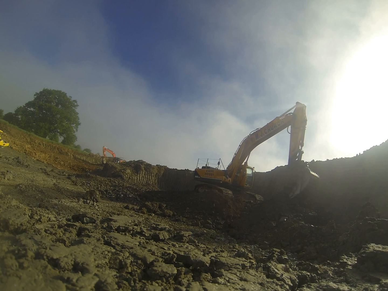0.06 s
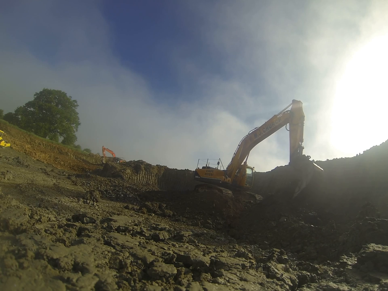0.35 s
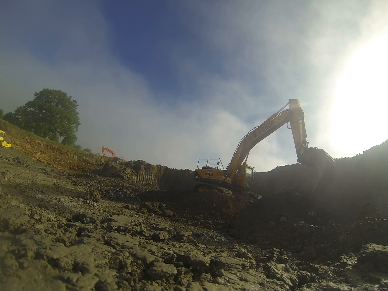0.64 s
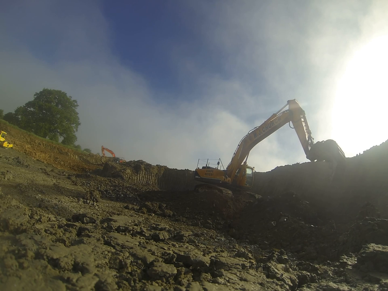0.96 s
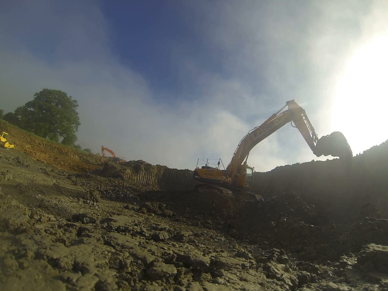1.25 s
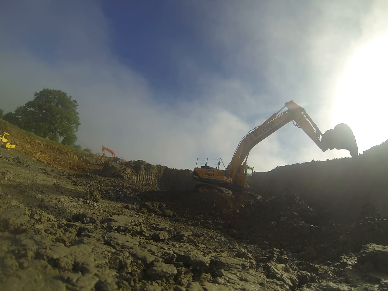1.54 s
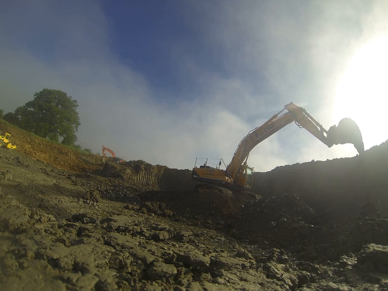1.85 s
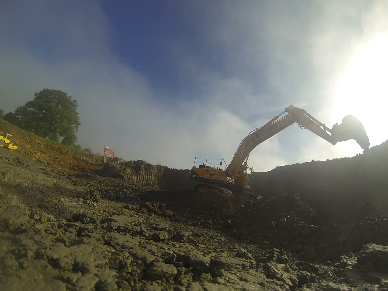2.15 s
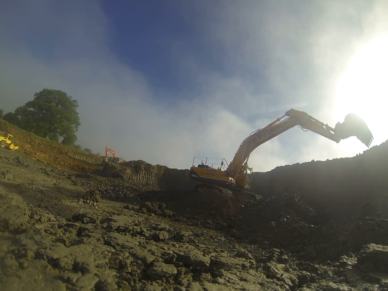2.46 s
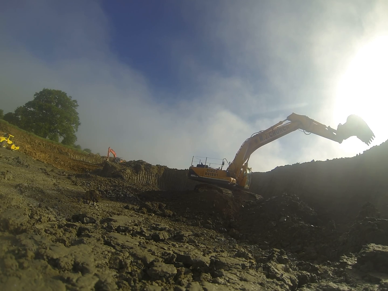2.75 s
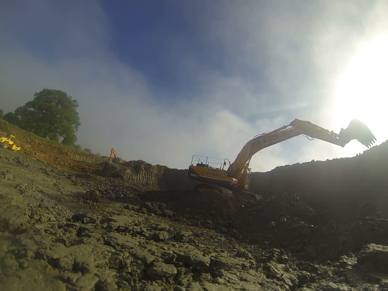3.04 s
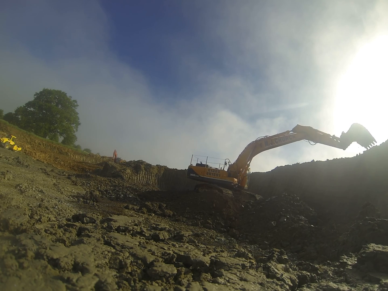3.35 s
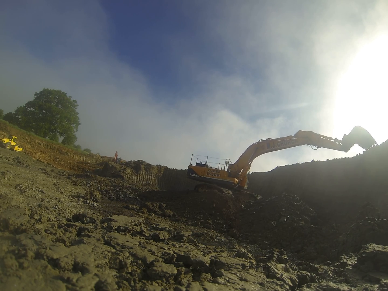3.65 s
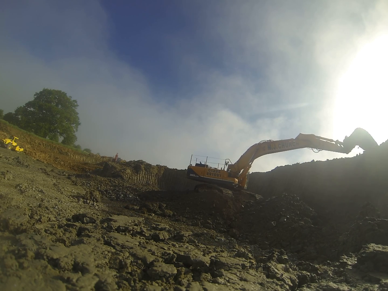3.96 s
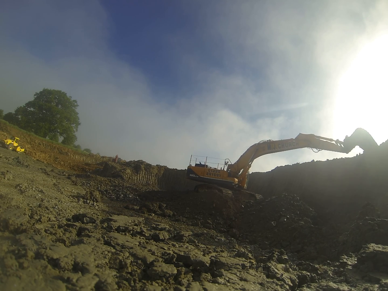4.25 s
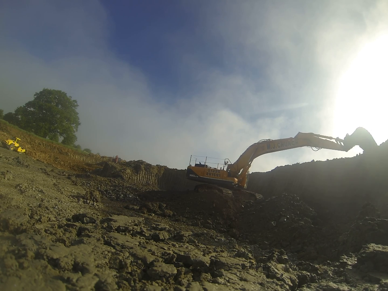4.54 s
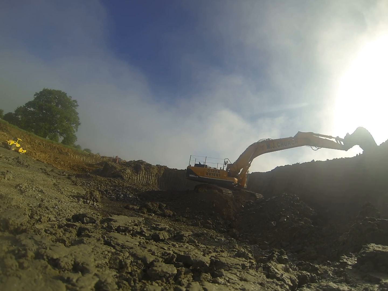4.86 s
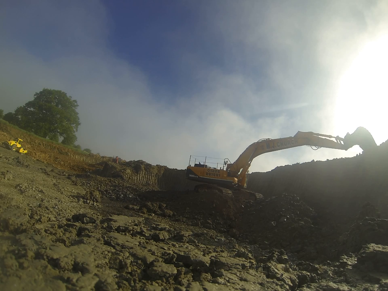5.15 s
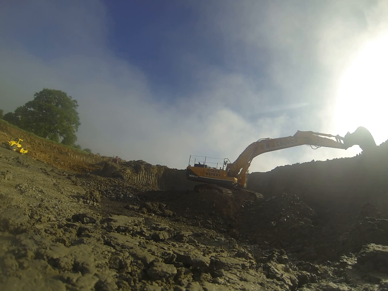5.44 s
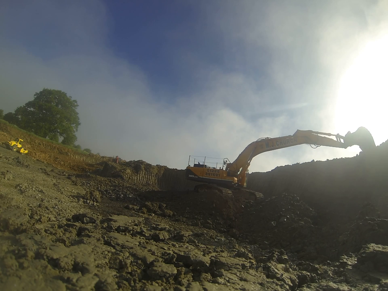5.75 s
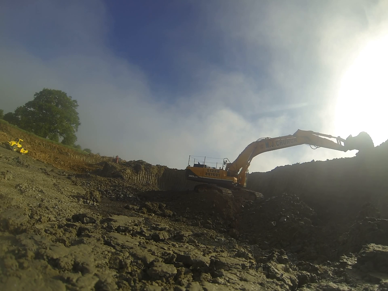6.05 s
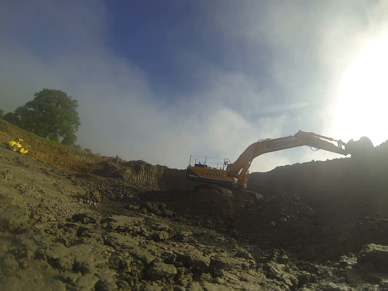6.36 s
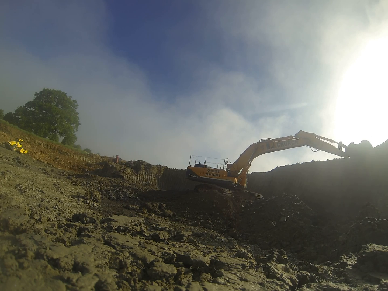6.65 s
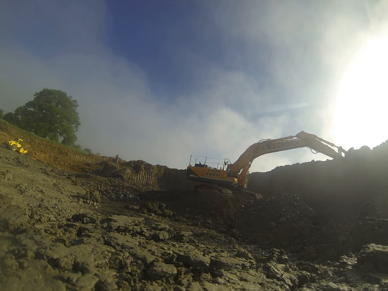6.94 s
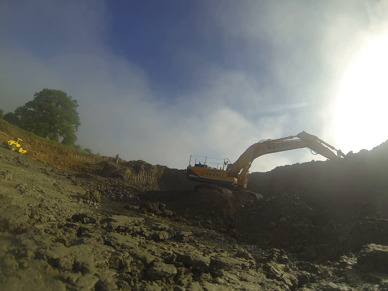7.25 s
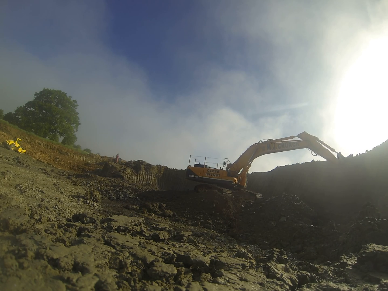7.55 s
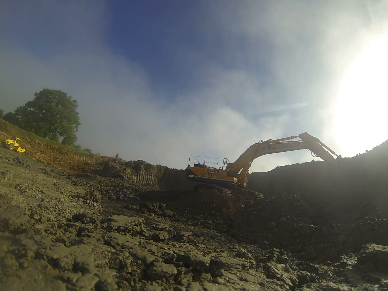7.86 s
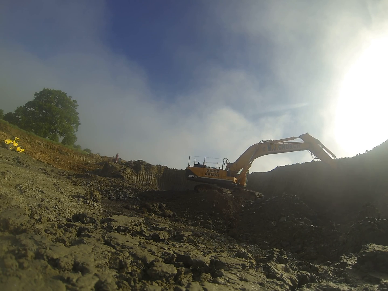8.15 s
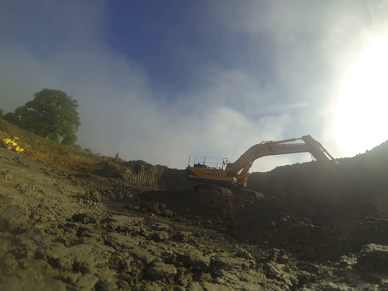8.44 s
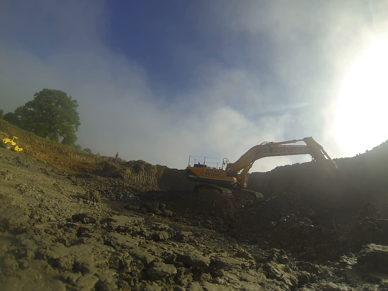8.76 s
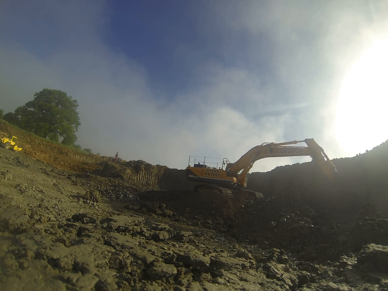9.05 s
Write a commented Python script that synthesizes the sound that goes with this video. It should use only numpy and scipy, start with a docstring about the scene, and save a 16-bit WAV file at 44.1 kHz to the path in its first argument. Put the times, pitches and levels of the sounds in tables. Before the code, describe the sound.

Diesel engines hum and clatter some way off as a digger's steel bucket knocks and tips earth, and one engine winds down.

```python
"""Some way off, a tracked excavator's bucket crunches into a stony slope while its six-cylinder diesel
drones and its piston pump sings. A second diesel holds top speed, with a humming fan and a whistling turbo.
A deep throb, like a vibrating roller, swells and fades through the ground all along. Near 4 s the bucket
tips, knocks and spills soil; at 5.5 s comes a short rattle. From 5.8 s the second diesel winds down,
its whistle falling, while the excavator works on."""
import sys
import numpy as np
from scipy.fft import rfft, irfft, next_fast_len
from scipy.io import wavfile
from scipy.ndimage import map_coordinates

SR = 44100
rng = np.random.default_rng(int(sys.argv[2]) if len(sys.argv) > 2 else 0)


def unload_wav(signal):
    """Save mono or channel-first audio to the path in sys.argv[1] as 16-bit WAV at rate SR, clipped to [-1, 1]."""
    wavfile.write(
        sys.argv[1],
        SR,
        np.round(np.clip(np.atleast_2d(signal).T, -1, 1) * 32767).astype(np.int16),
    )


N = 401310
T = np.arange(N) / SR


# the engine's speed wanders as its load changes: (time [s], firing rate [Hz])
ENGINE_SPEED = [(0.0, 88.7), (0.59, 84.93), (1.0, 86.7), (2.36, 86.7), (2.63, 89.0), (2.95, 85.64),
                (3.27, 87.4), (4.22, 86.3), (4.4, 88.8), (4.54, 86.6), (4.72, 87.1), (4.9, 88.7),
                (5.44, 87.93), (5.67, 85.96), (6.03, 89.2), (6.17, 86.35), (6.35, 87.34), (6.76, 88.45),
                (6.98, 85.06), (7.57, 89.04), (8.16, 86.7), (9.07, 87.1)]
def excavator():
    """The cylinders fire one after another, setting the beat for the engine and its oil pump."""
    firings = np.cumsum(curve(ENGINE_SPEED) * (1 + 0.0028 * wobble(8))) / SR  # counted from the start
    strokes = 3 * firings  # the pump's pistons beat three times per firing
    return (exhaust(firings) + pump(strokes) + arm_valve(firings, strokes)
            + engine_body(firings) + oil_hiss(firings))


# how loud the exhaust hums: (time [s], level [dB])
EXHAUST_LEVEL = [(0.0, -51), (0.23, -41.5), (0.58, -43.5), (0.71, -56), (1.59, -41.5), (1.95, -51),
                 (2.05, -66), (2.23, -44), (3.27, -41.5), (3.37, -49), (3.8, -39.5), (4.33, -45),
                 (4.69, -38.5), (5.02, -49), (5.27, -40.5), (5.4, -52), (5.53, -44), (5.9, -39.5),
                 (6.33, -55), (6.56, -42.5), (7.02, -45.5), (9.05, -44.5), (9.1, -53)]
def exhaust(firings):
    """One puff per firing makes a low hum, with a second tone an octave up (twice the pitch)."""
    hum = amp(curve(EXHAUST_LEVEL) - 0.6) * flutter(depth_db=1, rate=6.5) * tone(firings)
    return hum + amp(-55) * flutter(1.6, 5.4) * tone(2 * firings)


# the pump sings louder under load: (time [s], level before its dips are deepened [dB])
PUMP_LEVEL = [(0.0, -62), (0.12, -55), (0.58, -61), (1.09, -75), (2.43, -61.5), (2.71, -55), (2.81, -74),
              (2.91, -57.5), (3.27, -69), (3.42, -54), (3.52, -63), (3.85, -50), (4.61, -49.5), (4.66, -62),
              (5.04, -53.5), (6.74, -52.5), (7.0, -63.5), (8.46, -53.5), (8.62, -69.5), (8.92, -52),
              (9.1, -52)]
# ripples in the oil pressure: (time [s], level [dB])
RIPPLE_LEVEL = [(0, -85), (.4, -62), (.8, -71), (2.5, -68), (4.15, -72), (4.5, -62.5), (5.8, -61.5),
                (6.1, -72), (7.8, -63.5), (8.3, -70)]
def pump(strokes, full_load_db=-49, dip_scale=1.21):
    """The pistons push oil in quick beats, making a note; pressure ripple adds its octave."""
    level_db = full_load_db + dip_scale * (curve(PUMP_LEVEL) - full_load_db)
    note = amp(level_db) * flutter(1.8, 10) * tone(strokes + 0.063 * wobble(25))
    ripple = amp(curve(RIPPLE_LEVEL)) * flutter(2, 9) * tone(2 * strokes + 0.097 * wobble(30))
    return note + ripple


# a valve's whistling rush: (frequency [Hz], level [dB])
VALVE_SPECTRUM = [(1700, -37), (1900, -5.5), (2020, 2), (2150, -7.5), (2400, -49)]
# it grows as the arm draws in: (time [s], level [dB])
RUSH_LEVEL = [(0, -70), (2.4, -67), (3.2, -67.5), (5.5, -67.5), (7.3, -63), (9.1, -63.5)]
def arm_valve(firings, strokes):
    """Oil whistles through a valve; higher pump tones and the engine's ringing covers swell with it."""
    level_db = curve(RUSH_LEVEL)
    overtones = amp(level_db - 6) * flutter(1.5, 5) * tone(4 * strokes + 0.1 * wobble(30))
    overtones += amp(level_db - 6.5) * flutter(2, 6) * tone(3 * strokes + 0.25 * wobble(30))
    covers = amp(level_db - 7) * flutter(2, 5.6) * tone(10 * firings + 0.18 * wobble(24))
    return overtones + covers + amp(level_db) * coloured(noise(), VALVE_SPECTRUM)


# the engine's low rumble: (frequency [Hz], level [dB])
RUMBLE_SPECTRUM = [(15, -31), (30, -3), (60, 3.5), (95, -1), (125, -3), (165, -3.5), (205, -12),
                   (300, -7.5), (360, -14), (500, -13), (640, -17.5), (820, -16), (1000, -23.5),
                   (1600, -58.5)]
# how loud it rumbles: (time [s], level [dB])
ENGINE_LEVEL = [(0, -46.5), (.9, -50), (2.5, -48), (5.5, -48), (6.4, -48), (7.3, -48.5), (8, -48.5),
                (9.1, -48.5)]
# clattering metal, for both engines: (frequency [Hz], level [dB])
CLATTER_SPECTRUM = [(600, -39), (980, -17), (1130, -11), (1250, -3.5), (1350, 1.5), (1460, -3.5),
                    (1580, -3), (1680, -12.5), (1830, -24), (2600, -52.5)]
# both engines' clatter surges and sinks: (time [s], level change [dB])
CLATTER_SURGE = [(0, 0), (.4, 1), (.85, -0.5), (1.05, 0), (1.21, 2.5), (1.32, -4), (1.48, 3), (1.67, -1),
                 (1.8, 2), (2.3, 0.7), (3.1, 0), (3.6, -0.9), (4.35, 0.5), (4.5, -1.5), (4.7, 0.3),
                 (5.6, -0.5), (6.95, .5), (7.27, -0.5), (7.5, 0.9), (8.45, -0.5), (9.1, -.3)]
def engine_body(firings):
    """The engine rumbles, and each firing makes its metal block clatter."""
    rumble = amp(curve(ENGINE_LEVEL)) * coloured(noise(), RUMBLE_SPECTRUM)
    knocks = noise() * bursts(firings, sharpness=0.32, scatter_db=1.26)
    return rumble + amp(-54 + curve(CLATTER_SURGE)) * coloured(knocks, CLATTER_SPECTRUM)


# the hiss of oil: (frequency [Hz], level [dB])
OIL_SPECTRUM = [(1000, -15.5), (1850, -9), (2020, -2), (2200, -5), (2480, -8), (2900, -4), (3150, -9.5),
                (3750, -13), (4400, -17), (4850, -24.5), (5250, -16), (5800, -24), (6400, -19.5),
                (7600, -33), (10000, -53)]
# how loud it hisses: (time [s], level [dB])
OIL_LEVEL = [(0, -59), (2.6, -60.5), (3.6, -60), (4.4, -60.5), (5.1, -59.5), (6.7, -60), (7.45, -58.5),
             (7.8, -61), (9.1, -60.5)]
def oil_hiss(firings):
    """Oil rushes through the valves, pulsing slightly with the engine."""
    gain = amp(curve(OIL_LEVEL)) * flutter(0.3, 10)
    return gain * coloured(noise() * bursts(firings, sharpness=0.16, scatter_db=0.58), OIL_SPECTRUM)


# the notes the bucket's steel rings at: (pitch [Hz], width [Hz], level [dB])
STEEL_NOTES = [(282, 130, 12), (515, 260, 5.5), (783, 190, 0), (1316, 100, 1), (1426, 100, -1),
               (1577, 70, -3.5), (1976, 100, -1), (2303, 130, -3.5), (2980, 140, -14), (4480, 200, -18.5),
               (5280, 120, -25)]
# knocks on the bucket and its links: (time [s], ring level [dB], ring fade time [s],
# favoured pitch [Hz], lowest pitch [Hz], crack level [dB], snap level [dB])
BUCKET_KNOCKS = [(.001, -33.5, 0.11, 1320, 250, -46, -53), (.011, -39.5, 0.21, 1980, 500, -57, -69),
                 (0.577, -43.5, 0.33, 1500, 600, -55.5, -57), (2.638, -48.5, 0.19, 2400, 750, -48, -62),
                 (3.833, -50, .14, 2300, 250, -50.5, -72), (3.871, -44, 0.23, 400, 200, -56, -70),
                 (3.912, -48.5, 0.17, 400, 200, -58, -74), (3.984, -43, 0.14, 1400, 250, -49, -60),
                 (4.025, -45.5, 0.17, 2000, 250, -49, -68), (5.519, -48, 0.16, 1350, 500, -68, -76)]
# the crack of a hit: (frequency [Hz], level [dB])
CRACK_SPECTRUM = [(200, -11), (1000, -9), (1700, 0), (2300, 5.5), (2900, 1.5), (3400, -11), (4300, -5),
                  (5200, -19), (9000, -35)]
# its higher snap: (frequency [Hz], level [dB])
SNAP_SPECTRUM = [(2500, -15), (4600, -7), (5300, 0.5), (6600, -1.5), (7400, -11), (9000, -16), (14000, -31)]
def bucket(favour_db=8, favour_octaves=0.098, attack_s=0.00033, crack_fade_s=0.12):
    """Each knock cracks, snaps and rings the soil-damped steel; where it lands picks the loudest notes."""
    hz, widths, note_db = np.transpose(STEEL_NOTES)
    # each note is a narrow band of noise around its pitch
    notes = np.array([unit(wobble(1.5 * w) * tone(f * T) + wobble(1.5 * w) * tone(f * T + 1 / 4))
                      for f, w in zip(hz, widths)])
    ring, crack, snap = np.zeros((3, N))
    for start, db, fade_s, favoured_hz, lowest_hz, crack_db, snap_db in BUCKET_KNOCKS:
        boost_db = favour_db * np.exp(-0.5 * (np.log2(hz / favoured_hz) / favour_octaves) ** 2)
        # notes below this knock's lowest pitch are softened
        gains = amp(note_db + boost_db) / (1 + (lowest_hz / hz) ** 4)
        ring += amp(db) * strike(start, attack_s, fade_s) * (gains @ notes) / np.linalg.norm(gains)
        burst = strike(start, attack_s, crack_fade_s)
        crack += amp(crack_db) * burst
        snap += amp(snap_db) * burst
    return ring + crack * coloured(noise(), CRACK_SPECTRUM) + snap * coloured(noise(), SNAP_SPECTRUM)


# stony ground breaking: (frequency [Hz], level [dB])
CRUNCH_SPECTRUM = [(80, -5), (190, 3), (330, 0.5), (520, -2), (680, -6), (800, -3), (1080, -12), (1500, -8),
                   (2300, -7), (2750, -22), (3100, -19), (4000, -31), (4500, -26), (4900, -38), (6500, -36),
                   (10000, -52)]
def bite(level_db=-35, fade_s=0.36):
    """At the start, stones break under the bucket's teeth in a dense, uneven crunch."""
    grains = amp(3.5 * wobble(420))
    return amp(level_db - 60 * T / fade_s) * coloured(noise() * grains, CRUNCH_SPECTRUM)


# brief surges in the clatter: (time [s], level [dB], fade time [s])
CLATTER_PEAKS = [(.133, -43.5, 0.14), (.278, -40.5, .06), (.469, -45, .1), (.605, -47.5, 0.23),
                 (.715, -46, 0.14), (1.232, -44, .08), (2.613, -44, .06), (5.524, -36.5, 0.16),
                 (5.572, -45, 0.14), (5.606, -49, 0.091), (5.895, -46, .07)]
def clatter_peaks(chatter_db=3, attack_s=0.002):
    """The engines' clatter surges briefly now and then, with one louder rattle at 5.5 s."""
    swell = sum(amp(db) * strike(start, attack_s, fade_s) for start, db, fade_s in CLATTER_PEAKS)
    return swell * coloured(noise() * amp(chatter_db * wobble(350)), CLATTER_SPECTRUM)


# groans and scrapes: (middle time [s], half length [s], pitch [Hz], level [dB], roughness [0-1])
STEEL_GROANS = [(.63, 0.04, 740, -58, 0.06), (0.703, 0.03, 1390, -48.5, 0),
                (2.692, 0.038, 279, -49.5, 0.09), (2.8, .04, 5210, -75, 0.04),
                (3.76, 0.026, 3080, -63.5, 0.02), (3.78, .04, 3350, -67, .03),
                (3.889, 0.009, 1460, -35.5, 0.02), (3.9, .03, 873, -55, 0.04),
                (4.006, 0.035, 827, -52.5, .055), (5.63, .11, 5210, -73.5, 0.02),
                (7.935, 0.074, 1347, -52, 0)]
def groans(judder_db=2.5):
    """Loaded pins and scraped steel sing briefly; sticking and slipping shakes the pitch and level."""
    slip_s = np.cumsum(wobble(450)) / SR
    sound = np.zeros(N)
    for middle, half, hz, db, roughness in STEEL_GROANS:
        swell = amp(db) * np.exp(-0.5 * ((T - middle) / half) ** 2)
        sound += swell * tone(hz * (T + roughness * slip_s))
    return sound * amp(judder_db * wobble(140))


# sliding soil: (frequency [Hz], level [dB])
SOIL_SPECTRUM = [(80, -5), (160, 14), (400, 16), (900, -4), (1800, 3), (3200, 3), (4700, -7), (6000, -3),
                 (6900, -14), (8000, -24), (10000, -15), (13000, -37)]
def spill(start_s=3.54, end_s=4.03, peak_db=-54, growth_db_per_s=17, attack_s=0.13, release_s=0.018):
    """Soil slides out in uneven clumps, ever faster, and stops short when the bucket is empty."""
    opening = np.exp(np.minimum(T - start_s, 0) / attack_s)
    flow = amp(peak_db + growth_db_per_s * np.minimum(T - end_s, 0))
    emptying = np.exp(-since(end_s) / release_s)
    clumps = noise() * amp(2.2 * wobble(300))
    return opening * flow * emptying * coloured(clumps, SOIL_SPECTRUM)


# loose stones: (time [s], level [dB], pitch [Hz], fade time [s])
STONE_TICKS = [(.333, -59, 5700, .05), (.492, -49, 2380, 0.05), (.921, -52.5, 3000, .06),
               (1.877, -53, 3000, 0.045), (1.888, -65.5, 6000, .12), (3.19, -55, 2950, .12),
               (3.421, -57, 2900, 0.066), (3.725, -62, 5900, 0.33), (3.938, -64, 6000, .2)]
def stones():
    """Single stones tick and skid on the bucket: the smaller the stone, the higher its sound."""
    ticks = np.zeros(N)
    for start, db, hz, fade_s in STONE_TICKS:
        band = [(hz / 4, -44), (hz / 2, -11), (hz, 0), (hz * np.sqrt(2), -22), (hz * 2, -44)]
        ticks += (T > start) * amp(db - 60 * since(start) / fade_s) * coloured(noise(), band)
    return ticks


FUEL_CUT_S = 5.76  # when the second diesel starts to wind down
def second_diesel(top_hz=136.45, idle_hz=94.1, coast_s=0.62, cut_length_s=0.55, top_blade_hz=392.7):
    """A diesel holds top speed, then coasts towards idle; its knocks, fan and air intake fade."""
    spin = np.exp(-since(FUEL_CUT_S) / coast_s)  # 1 at top speed, 0 at idle
    cut = np.minimum(since(FUEL_CUT_S) / cut_length_s, 1)
    firing_hz = idle_hz + (top_hz - idle_hz) * spin
    firings = np.cumsum(firing_hz * (1 + 0.00064 * wobble(5))) / SR
    block = engine_block(firings)
    hum_db = -53 - 8.5 * cut * spin  # the exhaust is softer while coasting without fuel
    hum = amp(hum_db) * flutter(1.5, 2.51) * (tone(firings) + amp(-16) * tone(2 * firings))
    intake_band = [(4000, -18), (5200, -4.5), (5800, -11), (6500, -1), (7100, -8.5), (8500, -23.5)]
    intake = amp(-75 - 10 * cut) * coloured(noise(), intake_band)
    return hum + intake + amp(-17 * cut) * (block + fan(firings * top_blade_hz / top_hz))


# the second diesel's strongest ringing tones: (pitch [multiples of the cycle rate])
BLOCK_MULTIPLES = [38, 48, 56, 57, 59, 62, 66, 70]
# each of them at top speed: (level [dB])
BLOCK_LEVELS = [-73.5, -66, -63.5, -65, -69.5, -68.5, -70, -72.5]
def engine_block(firings, cylinders=6):
    """The knocks repeat each time all cylinders have fired, so clear tones stand out of the clatter."""
    cycles = firings / cylinders
    ring = sum(amp(db) * flutter(2.5, 3.94) * tone(k * cycles + 0.07 * wobble(12))
               for k, db in zip(BLOCK_MULTIPLES, BLOCK_LEVELS))
    knocks = bursts(firings, sharpness=1.1, scatter_db=0.9, uneven_db=2.5)
    return ring + amp(-56 + curve(CLATTER_SURGE)) * coloured(noise() * knocks, CLATTER_SPECTRUM)


# the cooling fan's main note at top speed: (time [s], level [dB])
FAN_LEVEL = [(0.0, -61.5), (1.79, -54), (2.9, -63), (4.49, -68.5), (5.7, -65)]
# its higher tones: (pitch [multiples of the blade rate])
FAN_MULTIPLES = [2, 3, 3.5, 4, 4.5, 5, 5.5, 6]
# each of them at top speed: (level [dB])
FAN_TONE_LEVELS = [-77, -67, -68, -63.5, -77.5, -73, -77, -75]
def fan(blade_passes):
    """Passing blades hum; their uneven spacing adds tones between the whole multiples."""
    note = amp(curve(FAN_LEVEL) + 0.24) * tone(blade_passes + 0.07 * wobble(23))
    return note + sum(amp(db) * flutter(2.5, 4.08) * tone(k * blade_passes + 0.1 * wobble(14))
                      for k, db in zip(FAN_MULTIPLES, FAN_TONE_LEVELS))


# the second diesel's turbo whistle: (time [s], level [dB])
WHISTLE_LEVEL = [(0, -102), (1.85, -82.5), (2.4, -89), (3.3, -96), (5.75, -94), (5.98, -74), (6.22, -82),
                 (6.6, -85.5), (7, -82.5), (7.45, -80), (8.3, -100)]
def turbo(top_hz=11470, sag_hz_per_s=160, idle_hz=4720, coast_s=1.5, last_echo_s=0.06):
    """The turbo's thin whistle sags under load and falls once the fuel is cut; the slope echoes it."""
    coasting = since(FUEL_CUT_S)
    loaded_hz = top_hz - sag_hz_per_s * np.minimum(T, FUEL_CUT_S)
    whistle_hz = idle_hz + (loaded_hz - idle_hz) * np.exp(-coasting / coast_s)
    blur_hz = 55 + 120 * (T > FUEL_CUT_S) * np.exp(-coasting / 0.3)  # the airflow flutters after the cut
    whistle = amp(curve(WHISTLE_LEVEL)) * tone(np.cumsum(whistle_hz + blur_hz * wobble(400)) / SR)
    delays = (np.linspace(0, last_echo_s, 5) * SR).astype(int)
    return sum(np.pad(whistle, (d, 0))[:N] for d in delays) / np.sqrt(len(delays))


# the throb in the ground: (time [s], level [dB])
THROB_LEVEL = [(0.0, -26), (0.05, -28.5), (0.25, -28), (0.66, -40), (0.71, -34.5), (1.57, -28),
               (2.43, -36.5), (2.56, -42), (3.47, -27), (5.14, -25.5), (6.03, -19), (6.56, -19.5),
               (7.53, -26), (7.93, -35), (8.24, -25), (8.49, -22), (9.05, -22), (9.1, -25)]
def roller(shake_hz=35.15):
    """A spinning off-centre weight shakes the ground at a steady rate."""
    return amp(curve(THROB_LEVEL)) * tone(shake_hz * T + 0.042 * wobble(3.2))


# the background hiss: (frequency [Hz], level [dB])
AIR_SPECTRUM = [(100, 6), (5000, 9), (8500, 7), (9950, 2), (10300, 15), (10650, 5), (11200, 3.5),
                (12500, -10), (15000, -17)]
def air():
    """A faint hiss with a thin, high ring."""
    return amp(-73) * coloured(noise(), AIR_SPECTRUM)


def amp(db):
    """Turn decibels into a gain to multiply by."""
    return 10 ** (np.asarray(db) / 20)


def unit(x):
    """Scale x to an average strength (rms) of 1."""
    return x / np.sqrt(np.mean(x ** 2) + 1e-20)


def curve(rows):
    """Join (time, value) points with straight lines, one value per sample."""
    return np.interp(T, *np.transpose(rows))


def since(start):
    """Seconds after a moment, zero before it."""
    return np.maximum(T - start, 0)


def strike(start, attack_s, fade_s):
    """A quick rise, then a fall of 60 dB over the fade time."""
    age = since(start)
    return (1 - np.exp(-age / attack_s)) * amp(-60 * age / fade_s)


def wobble(rate):
    """A smooth curve through `rate` random points a second."""
    return map_coordinates(rng.standard_normal(int(N * rate / SR) + 4), [T * rate])


def flutter(depth_db, rate):
    """Moving air makes a distant sound's level waver."""
    return amp(depth_db * wobble(rate))


def filtered(x, response):
    """Scale each frequency in x by response(frequency)."""
    size = next_fast_len(N + SR // 2)
    return irfft(rfft(x, size) * response(np.fft.rfftfreq(size, 1 / SR)), size)[:N]


def coloured(x, spectrum):
    """Shape x with (frequency [Hz], level [dB]) points, then scale it to strength 1."""
    f, db = np.transpose(spectrum)
    return unit(filtered(x, lambda hz: amp(np.interp(np.log(hz + 1), np.log(f), db))))


def noise():
    """White noise: an even hiss."""
    return rng.standard_normal(N)


def tone(turns):
    """A pure tone of strength 1, one wave per turn."""
    return np.sqrt(2) * np.sin(2 * np.pi * turns)


def bursts(turns, sharpness, scatter_db, uneven_db=0):
    """One fading burst per turn, each of its own size; strong and weak ones may alternate."""
    sizes = amp(scatter_db * rng.standard_normal(4096) + uneven_db * (-1) ** np.arange(4096))
    return unit(sizes[turns.astype(int) % len(sizes)] * np.exp(-sharpness * (turns % 1)))


def scene():
    """The machines and the digging, over a faint hiss, in one channel."""
    background = air()
    machines = excavator() + second_diesel() + turbo() + roller()
    short_sounds = bucket() + bite() + clatter_peaks() + groans() + spill() + stones()
    return (machines + short_sounds + background)[None]


def record(dry, top_hz=15600, fade_s=0.004):
    """Fade both ends so they do not click, and remove the highest treble."""
    edges = np.clip(np.minimum(T, T[-1] - T) / fade_s, 0, 1)
    return filtered(dry[0] * edges, lambda hz: hz < top_hz)[None]


dry = scene()
out = record(dry)
unload_wav(out)
```